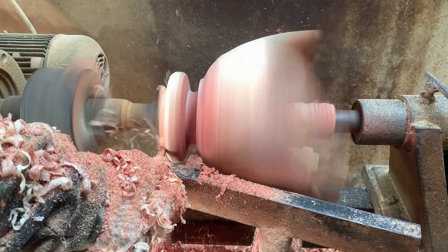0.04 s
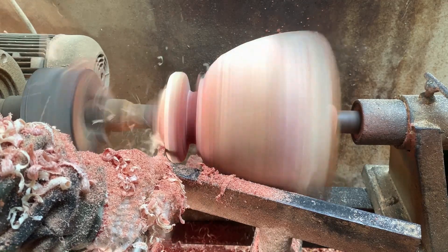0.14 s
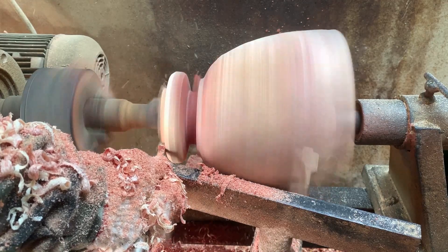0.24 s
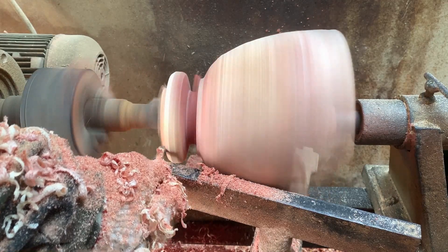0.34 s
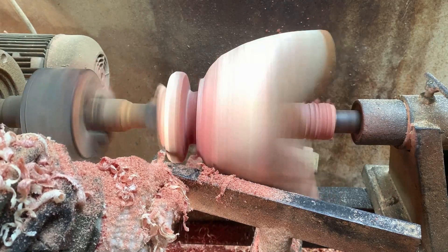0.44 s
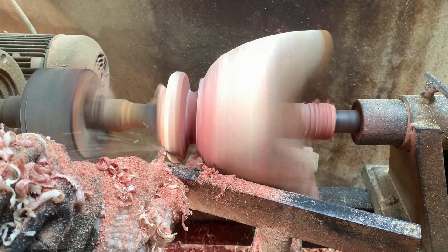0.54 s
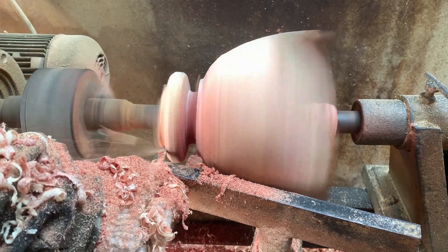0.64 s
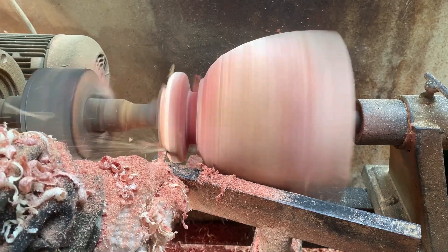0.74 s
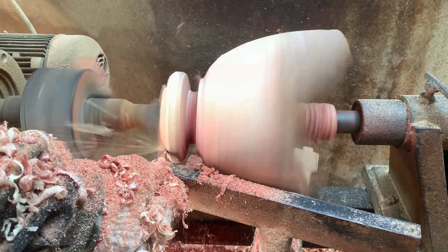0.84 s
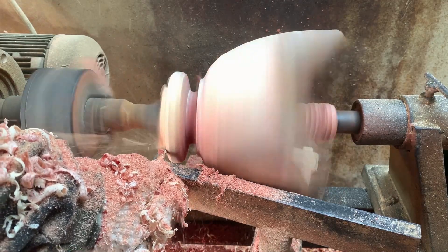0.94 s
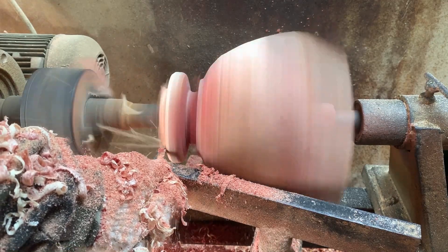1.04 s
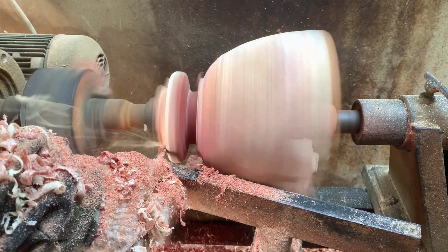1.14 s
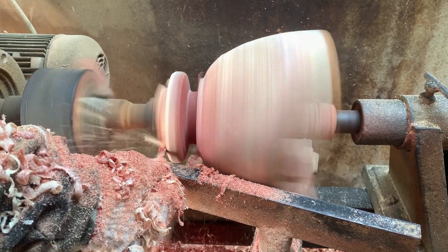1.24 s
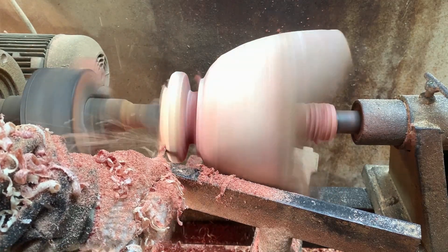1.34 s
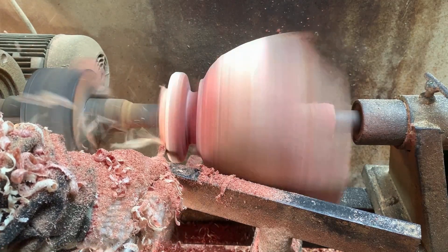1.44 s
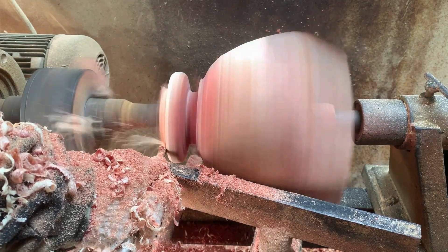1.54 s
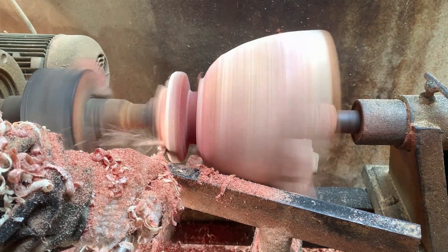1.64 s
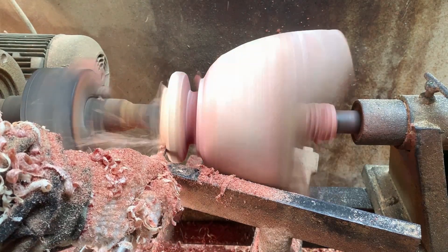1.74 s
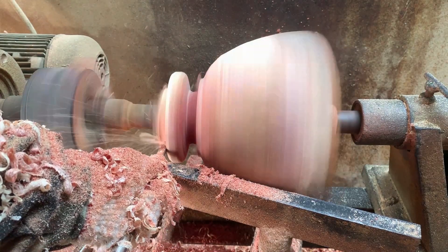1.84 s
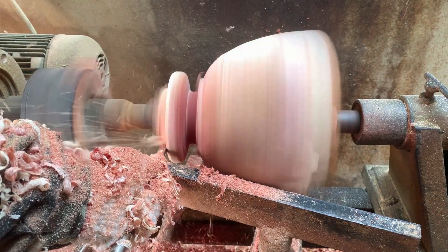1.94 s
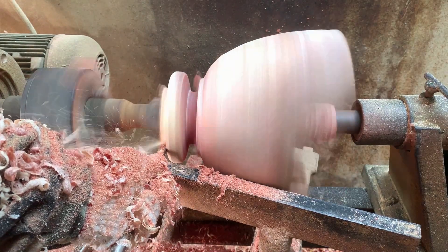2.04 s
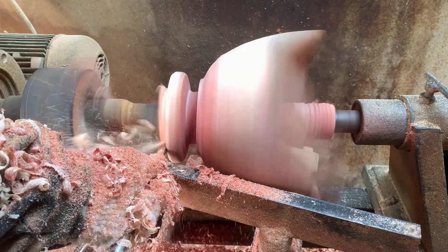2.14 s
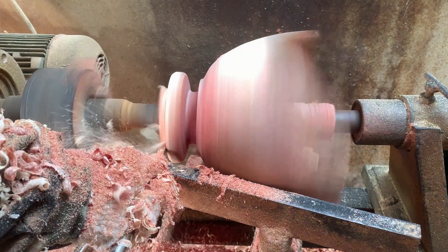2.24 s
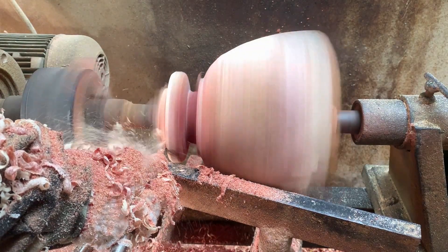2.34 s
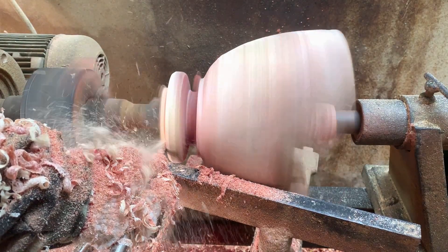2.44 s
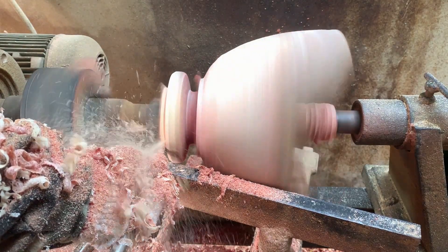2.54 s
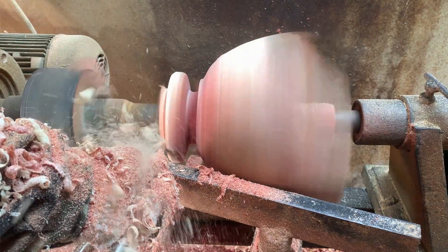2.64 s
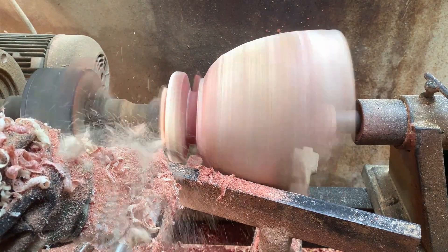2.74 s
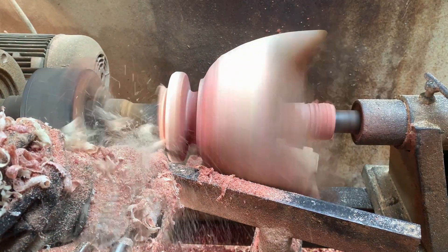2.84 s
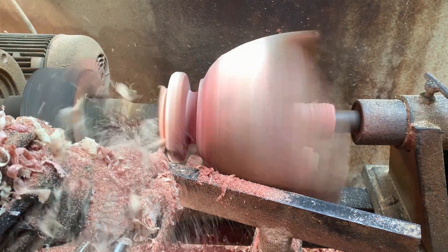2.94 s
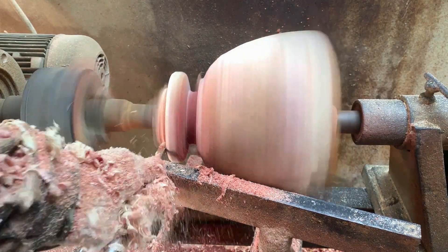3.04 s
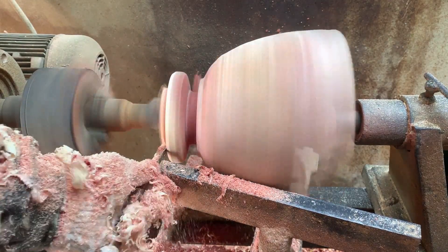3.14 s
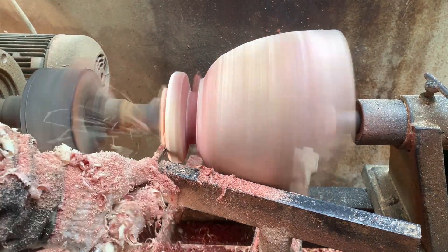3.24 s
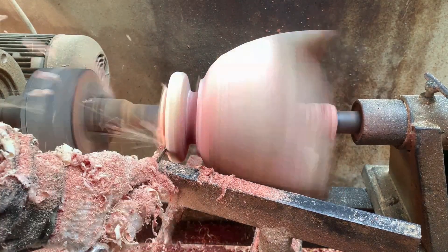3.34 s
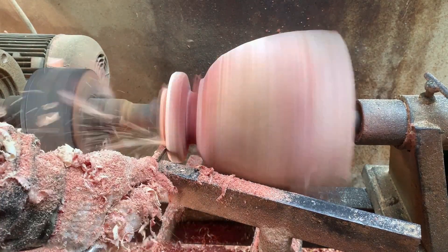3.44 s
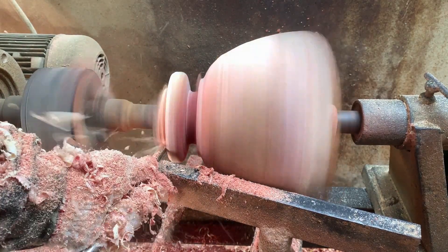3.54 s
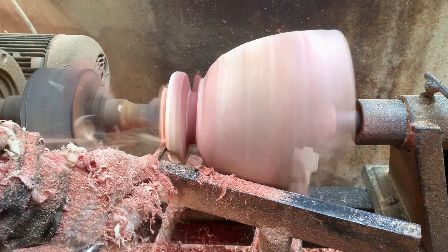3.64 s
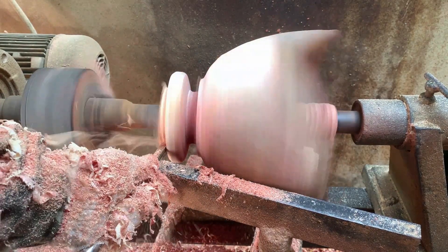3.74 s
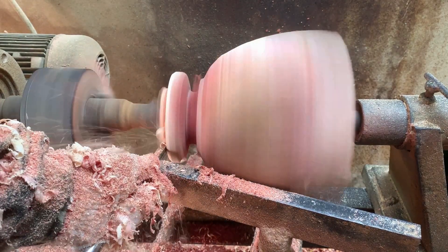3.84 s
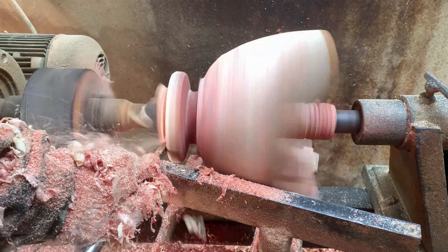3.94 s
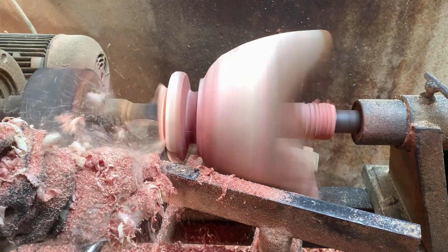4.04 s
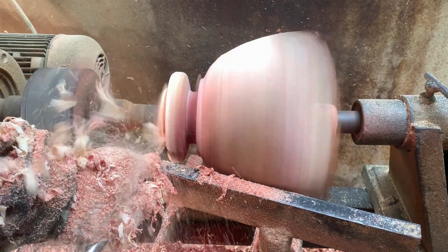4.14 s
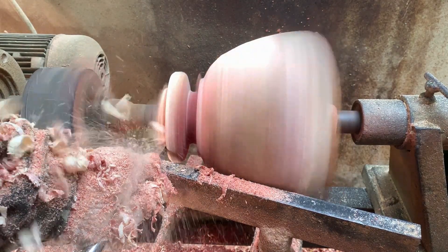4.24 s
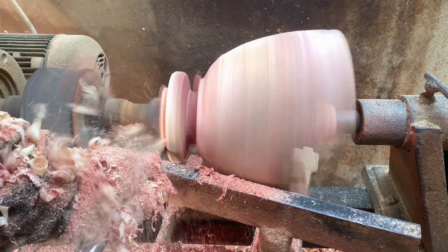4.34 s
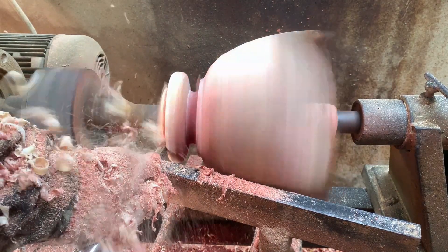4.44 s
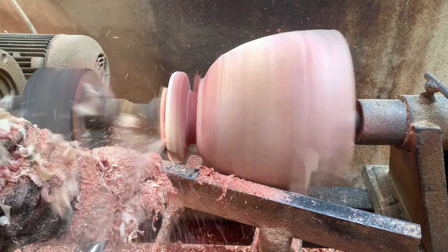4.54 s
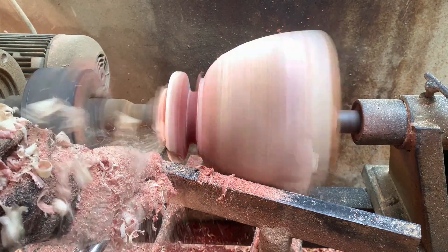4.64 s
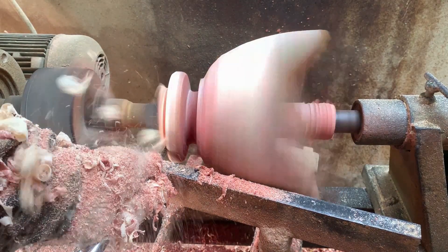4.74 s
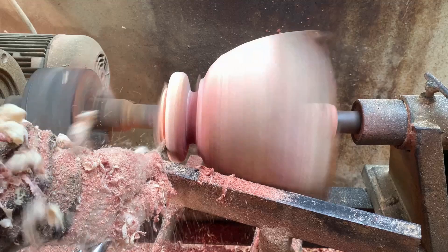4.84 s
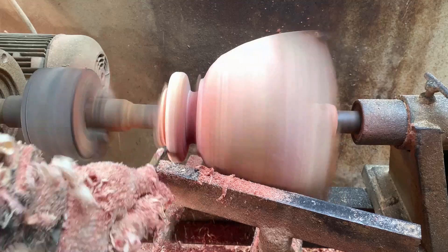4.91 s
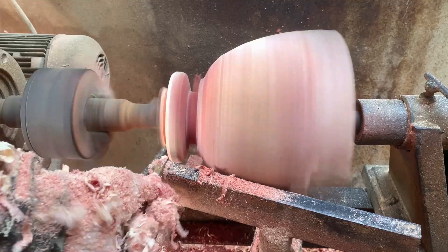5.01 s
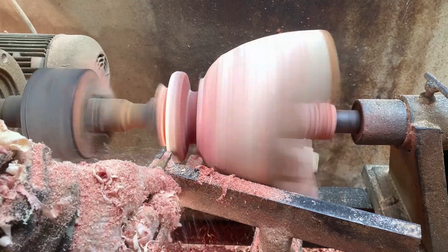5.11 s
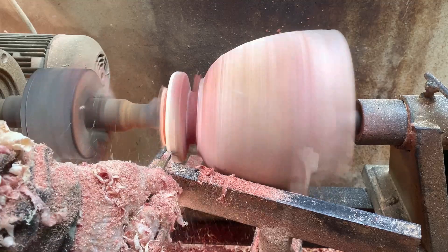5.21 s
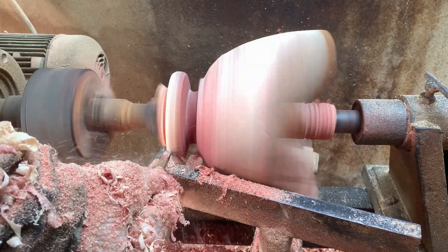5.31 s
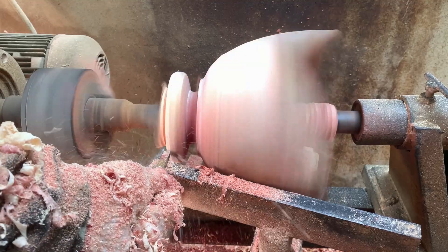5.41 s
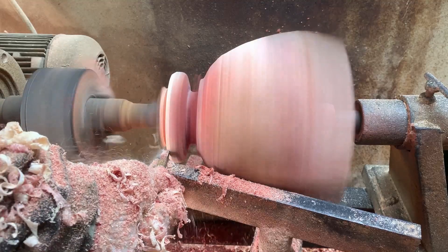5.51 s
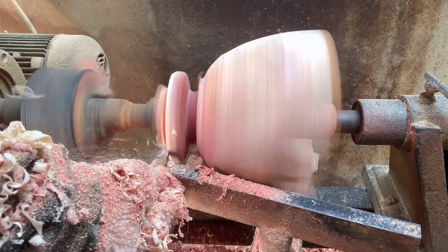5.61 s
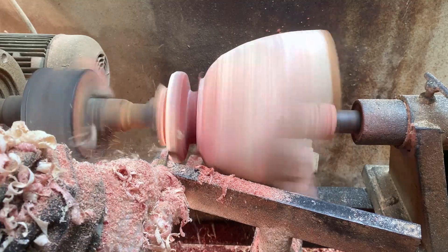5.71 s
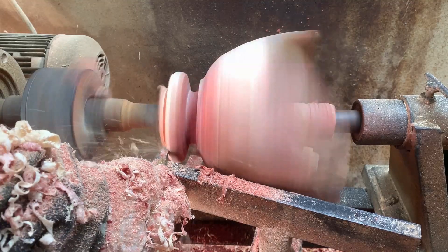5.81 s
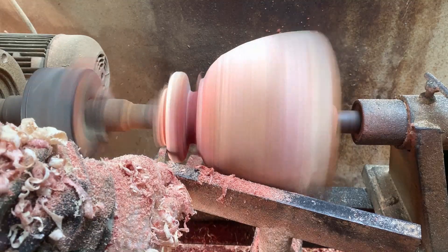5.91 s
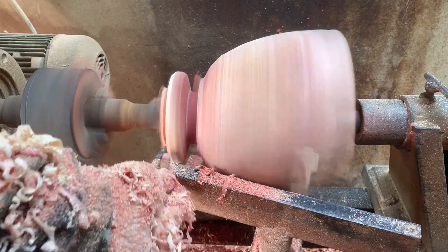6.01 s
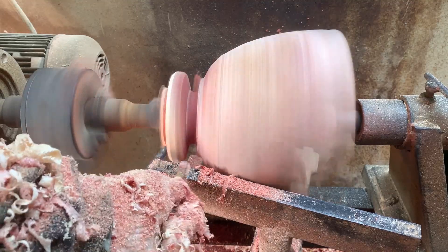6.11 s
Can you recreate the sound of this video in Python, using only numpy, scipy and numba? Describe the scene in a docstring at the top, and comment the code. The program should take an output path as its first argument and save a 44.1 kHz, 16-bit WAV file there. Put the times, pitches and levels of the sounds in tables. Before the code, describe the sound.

A lathe runs throughout, a low-level throbbing drone of motor rattle, fan noise, faint hum and very thin whine, in a close, hard-walled workshop. A rasp already under way stops at 0.25 s. Faint brushing ticks from about 0.45 s lead into a long pass: a dry hiss and tearing crackle, fluttering some 38 times a second, thickens into a hoarse squawk near 1.7 to 1.9 kHz. Small squeaks, dull thumps and sharp catches dot it; from 1.5 s the catches grow stronger, and the squawk sinks in pitch until it cuts off at 3.0 s. After a short gap, the third pass, 3.2 to 4.85 s, is equally harsh and bright, with squeaks around 3.6 s and woody bumps on the rest near 4.0 s. Motor alone briefly. A thinner, quieter, hissing scrape starts abruptly at 5.15 s, swells unevenly and lifts off at 5.9 s, leaving the drone.

```python
"""A gouge rasps and squawks in four passes on a bowl blank that a wood lathe spins at about 19 turns a second.
The edge meets end grain twice a turn: tearing fibres are dense random clicks, which also ring the steel.
The cutting force shakes the tool rest and bed, made as filtered clicks and low noise.
Under it the motor and bearings drone, as pulsing noise, a hum and a whine.
Hard workshop walls close by scatter the sound of the cut to both sides."""
import sys
import numpy as np
from scipy import signal
from scipy.fft import rfft, irfft, next_fast_len
from scipy.io import wavfile
from scipy.ndimage import uniform_filter1d
from numba import njit

SR = 44100
rng = np.random.default_rng(int(sys.argv[2]) if len(sys.argv) > 2 else 0)


def transcribe(u):
    """Save the signal u as a 16-bit wav file named by the first command-line argument.

    u: samples, shape (n,) or (channels, n), limited to [-1, 1]; the rate is SR.
    q: integer samples, one column per channel.
    """
    v = np.clip(np.atleast_2d(u).T, -1, 1)
    q = np.round(v * 32767).astype(np.int16)
    wavfile.write(sys.argv[1], SR, q)


N = 272097

# shaking of the machine by the lopsided blank: time_s, level_db
SHAKE = [(0, -46.5), (1.1, -46), (1.75, -47.5), (2.05, -47), (2.3, -48), (2.9, -49.5), (3.35, -54),
         (4.3, -51.5), (4.95, -54.5), (5.2, -53.5), (6.17, -51.5)]
STEEL_WANDER = 0.0051  # share by which the steel's pitches stray as the contact shifts


def undb(db):
    """Turn decibels into gain."""
    return 10 ** (np.asarray(db) / 20)


def curves(table):
    """Join the points of each column by straight lines in time; the first column is the time."""
    s, *columns = np.transpose(table)
    return [np.interp(np.arange(N) / SR, s, c) for c in columns]


def bins():
    """Frequencies of the spectrum lines in Hz, at least 1 so that logarithms work."""
    size = next_fast_len(N, real=True)
    return np.maximum(np.arange(size // 2 + 1) * SR / size, 1)


def shape(x, gain):
    """Filter both sides by a gain curve over frequency."""
    size = next_fast_len(N, real=True)
    return irfft(rfft(x, size) * gain, size)[:, :N]


def slope(points):
    """Gain curve through points of pitch in Hz and level in dB."""
    hz, db = np.transpose(points)
    return undb(np.interp(np.log(bins()), np.log(hz), db))


def ring(modes):
    """Gain curve of a set of resonances with steep skirts."""
    f = bins()
    power = 0
    for hz, width, db in modes:
        distance = (f * f - hz * hz) / (2 * f * width)
        power = power + (undb(db) / (1 + distance ** 2 * 2)) ** 2
    return np.sqrt(power)


def colour(x, gain):
    """Filter by a gain curve and bring to rms 1."""
    y = shape(x, gain)
    return y / y.std()


def walk(rate):
    """Slow random drift with a spread of 1, drawing a new value about rate times a second."""
    k = max(int(SR / rate), 2)
    steps = np.repeat(rng.standard_normal(N // k + 1), k)
    y = uniform_filter1d(steps, k)[:N]
    return y / y.std()


def noise():
    """Unrelated noise on the two sides."""
    return rng.standard_normal((2, N))


def fractures(rate, spread_db):
    """Dense clicks of snapping fibres, rate a second; a wider spread makes a few much larger."""
    chance = rng.random((int(rate * N / SR), 4))
    size = undb(spread_db * np.minimum(-np.log(1 - chance[:, 0]), 4))
    at = (chance[:, 1] * N).astype(int)
    # each click has the same size on both sides but an independent sign
    clicks = np.array([np.bincount(at, size * np.sign(side - .5), N) for side in chance[:, 2:].T])
    return clicks / clicks.std()


@njit
def resonate(x, hz, width):
    """Band-pass whose centre moves, built from two coupled stores of energy."""
    y, b, l = np.empty(len(x)), 0., 0.
    for i in range(len(x)):
        g, k = np.tan(np.pi * hz[i] / SR), width / hz[i]
        v = (b + g * (x[i] - l)) / (1 + g * (g + k))
        b, l, y[i] = 2 * v - b, l + 2 * g * v, k * v
    return y


def moving_ring(drive, hz, width):
    """Ring a steep resonance whose centre moves: two equal band-passes in a row, brought to rms 1."""
    y = np.array([resonate(resonate(side, hz, 2. * width), hz, 2. * width) for side in drive])
    return y / y.std()


def ease(x):
    """Smooth rise from 0 to 1."""
    x = np.clip(x, 0, 1)
    return x * x * (3 - 2 * x)


def swell(s, rise_s):
    """Envelope that starts at time s, peaks at 1 after rise_s and then dies away."""
    start, envelope = int(s * SR), np.zeros(N)
    age = np.arange(min(SR // 5, N - start)) / SR / rise_s
    envelope[start:start + len(age)] = age * np.exp(1 - age)
    return envelope


def short_tones(table, rise_s, waver):
    """A single resonance swings up and dies away, its pitch a little unsteady."""
    clock = np.cumsum(1 + waver * walk(150)) / SR
    total = 0
    for s, db, hz in table:
        tone = np.sin(2 * np.pi * (hz * clock + rng.random((2, 1)) / 2))
        total = total + undb(db) * swell(s, rise_s) * tone
    return total


def gouge():
    """Each pass eases in, changes depth steadily and lifts off; depth sets chatter pitch and layer gains."""
    # passes: start_s, end_s, attack_s, hiss_stops_sooner_s, tearing_fibres_db, edge_hiss_db, chatter_db,
    # shank_relative_to_chatter_db, tip_relative_to_hiss_db, dust_relative_to_hiss_db,
    # depth_at_start, depth_at_end (0 grazing, 1 deep)
    pass_table = [(-0.14, 0.25, 0.24, 0.008, -40.5, -40.5, -31, 1.5, -0.5, -21, 0.5, 0.56),
                  (0.445, 3, 0.3, 0.026, -37, -35.0, -26, 3.5, 0.3, -23, 0.02, 1.0),
                  (3.192, 4.855, 0.19, 0.0, -37.5, -38, -26, 3.0, 3, -24.5, 0.64, 1.04),
                  (5.148, 5.935, 0.013, 0.04, -49, -40.5, -40.5, -1, -4, -20, 0.29, 0.27)]
    # pressure of the hand on the gouge: time_s, level_db
    pressure = [(0.6, -1), (0.85, 1), (1.2, 0), (1.48, 0.4), (1.75, -1), (2.05, 1), (2.25, -2.5), (2.45, 2),
                (2.95, 0.2), (3.45, -1.4), (3.8, 1.24), (4.85, 0), (5.16, 1), (5.22, -5.5), (5.36, 1),
                (5.52, -1), (5.58, 2), (5.68, 4), (5.9, 0.5)]
    # the spinning wood just brushes the edge before it bites: start_s, level_db
    brush_table = [(0.444, -51), (0.472, -52), (0.499, -62), (0.524, -52), (0.548, -44), (0.576, -47),
                   (0.604, -39)]
    # roll of the gouge, which moves the contact along its edge: time_s, roll (about -1.5 to 1.1)
    roll = [(0, -1.1), (0.3, -0.57), (0.55, -0.49), (0.8, -0.28), (1.5, 0.07), (3.0, 1.12), (3.25, -1.51),
            (3.9, -1.06), (4.85, 0.19), (5.15, -0.71), (5.52, -0.67), (5.58, 0.22), (5.9, -0.53)]
    # how far out of round the wood is under the edge: time_s, runout (0 true, about 1 lopsided)
    runout = [(0.0, 0.3), (0.85, 0.34), (1.05, 1.03), (1.6, 0.68), (2.1, 0.47), (2.6, 0.2), (3.1, 0.21),
              (3.35, 0.8), (3.85, 1.1), (4.05, 0.34), (6.17, 0.22)]
    release_db_per_s, ring_on_db_per_s = 291, 217  # the rasp dies as the gouge lifts off, chatter more slowly
    bite_depth = 0.41  # below this depth the edge rubs more than it cuts
    rub_chatter_db, rub_tear_db, rub_hiss_db = -20, -2.5, 6.5  # rubbing: less chatter and tearing, more hiss
    buried_depth, buried_db = 0.63, -31  # past this depth the wood damps the tip, by this much per unit of depth
    buried_smoothing = 1.33  # a buried edge cuts more evenly: share of twice-a-turn swing lost per unit of depth
    bed_db, bed_build_s = 3, 0.42  # bed vibration relative to tearing, and the time it takes to build
    shank_depth_db, dust_depth_db = -16.5, 17  # by depth 1 the shank rings less and more dust flies
    # the shank breaks into ringing abruptly at this depth
    shank_on_depth, shank_on_range, shank_idle_db = 0.224, 0.02, -4
    grazing_hz, depth_sag_hz = 1911, 267.4  # chatter pitch at depth 0, and its fall by depth 1

    t, rows = np.arange(N) / SR, np.array(pass_table)
    current = np.maximum(np.searchsorted(rows[:, 0], t, side="right") - 1, 0)
    (start, end, attack, sooner, tear_db, hiss_db, chatter_db, shank_db, tip_db, dust_db,
     first_depth, last_depth) = rows[current].T
    age = t - start
    lifted = np.maximum(t - end, 0)
    edge_lifted = np.maximum(t - end + sooner, 0)
    push = ease(age / attack) * undb(curves(pressure)[0])
    depth = first_depth + (last_depth - first_depth) * np.minimum(age / (end - start), 1)
    rub = np.maximum(1 - depth / bite_depth, 0)
    buried = np.maximum(depth - buried_depth, 0)
    brush = sum(undb(db) * swell(s, rise_s=0.0036) for s, db in brush_table)
    shank_idle = 1 - ease((depth - shank_on_depth) / shank_on_range)
    return dict(tear=push * undb(tear_db + rub_tear_db * rub - release_db_per_s * lifted),
                hiss=brush + push * undb(hiss_db + rub_hiss_db * rub - release_db_per_s * edge_lifted),
                chatter=push * undb(chatter_db + rub_chatter_db * rub - ring_on_db_per_s * lifted),
                bed=push * ease(age / bed_build_s) * undb(tear_db + bed_db - ring_on_db_per_s * lifted),
                shank=undb(shank_db + shank_depth_db * depth + shank_idle_db * shank_idle),
                dust=undb(dust_db + dust_depth_db * depth),
                tip=undb(tip_db + buried_db * buried),
                swing=1 - buried_smoothing * buried,
                hz=grazing_hz - depth_sag_hz * depth,
                depth=depth, roll=curves(roll)[0], runout=curves(runout)[0])


def bite(turn, grain_db, grain_at, knock_db, knock_at, uneven_db, gap_db):
    """Cutting force: end grain twice a turn with a slack gap between, one knock a turn; no turn is alike."""
    grain = np.cos(4 * np.pi * (turn - grain_at))
    slack = ((1 - grain) / 2) ** 4
    high_side = np.cos(np.pi * (turn - knock_at)) ** 10
    force = undb(grain_db * grain - gap_db * slack + knock_db * high_side + uneven_db * walk(130))
    return force / np.sqrt(np.mean(force ** 2))


def rasp(turn, tool, crack):
    """Fibres tear in bursts; the same rhythm of force rings the steel, throws fine dust and snaps chips."""
    # spectrum of tearing fibres: pitch_hz, level_db
    tear_spectrum = [(300, -11.5), (550, 5), (780, 1), (980, 0.5), (1120, 1.5), (1400, 4.5), (2150, -0.5),
                     (2700, -2), (2900, 2.5), (3700, 0.5), (4900, -6), (5600, -5.5), (9000, -15),
                     (15000, -50)]
    # spectrum of the edge's hiss: pitch_hz, level_db
    hiss_spectrum = [(1500, -13.5), (3000, -11.5), (5100, -2), (5500, -5.5), (6600, -4), (7600, -4),
                     (7930, -6), (8150, 1), (9100, -10), (10100, -35), (10900, -21), (13000, -16),
                     (14200, -20), (15200, -43)]
    # spectrum of fine dust: pitch_hz, level_db
    dust_spectrum = [(8000, -8.5), (10500, 4.5), (12000, 4.5), (13700, -7), (14500, -16), (15600, -21)]
    force = bite(turn, grain_db=1.76 * tool["swing"], grain_at=0.38, knock_db=3.4 * tool["runout"],
                 knock_at=0.85, uneven_db=1.74, gap_db=4.4 * tool["swing"])
    tear = colour(fractures(rate=9000, spread_db=2.5), slope(tear_spectrum)) * undb(1.6 * walk(110))
    hiss = colour(fractures(rate=12000, spread_db=4.5), slope(hiss_spectrum)) * undb(-6.0 + 2.5 * walk(110))
    dust = colour(fractures(rate=3400, spread_db=0.0), slope(dust_spectrum)) * tool["dust"]
    edge = (hiss + steel(tool) + tip(tool) + dust) * tool["hiss"] * undb(3.0)
    # tearing follows the force only weakly, and cracks add to it
    tear_gain = force ** 0.35 * tool["tear"] * undb(7.0) + crack * undb(-6.5)
    return force * edge + tear * tear_gain + force * chips(tool)


def steel(tool):
    """Snapping fibres ring the steel, whose pitches wander and glide as the contact shifts."""
    # ringing of the steel: pitch_hz, width_hz, level_db, change_with_roll_db, change_with_depth_db,
    # glide_with_depth_hz
    steel_modes = [(2907, 220, -9, 0, -5.5, -30), (5970, 370, -7, -4.5, -2.5, 140),
                   (7320, 490, -5.5, 2.5, -1.5, 0), (8380, 760, -12, 1.5, 2.5, -200),
                   (9810, 520, -9.5, 5, 0.5, -260), (13830, 450, -22, 4.5, 1, -150)]
    total = 0
    for hz, width, db, roll_db, depth_db, glide_hz in steel_modes:
        pitch_hz = (hz + glide_hz * tool["depth"]) * (1 + STEEL_WANDER * walk(14))
        mode = moving_ring(fractures(rate=6000, spread_db=2.5), pitch_hz, width)
        level_db = db + roll_db * tool["roll"] + depth_db * tool["depth"] + 1.68 * walk(60)
        total = total + mode * undb(level_db)
    return total


def tip(tool):
    """The tip of the gouge rings as fibres snap, lower in a deep cut and damped when buried."""
    top_hz, sag_hz = 4370, 130  # ring at depth 0, and its fall by depth 1
    hz = (top_hz - sag_hz * tool["depth"]) * (1 + STEEL_WANDER * walk(14))
    tone = moving_ring(fractures(rate=5400, spread_db=3.5), hz, 227)
    return tone * tool["tip"] * undb(-3.0 + 1.96 * walk(60))


def chips(tool):
    """Coarse chips snap off among the fibres, clicks ringing at a quickly changing random pitch."""
    middle_hz, scatter, level_db = 3600, 0.22, -5  # level relative to the gouge's tearing gain
    hz = np.clip(middle_hz * np.exp(scatter * walk(70)), 2000, 7000)
    return moving_ring(fractures(rate=700, spread_db=2.5), hz, 340) * tool["tear"] * undb(level_db)


def chatter(turn, tool, surge):
    """The gouge bounces in a rough squawk that flares at each knock and sinks as the cut deepens."""
    # close bending modes of the chattering gouge: multiple_of_chatter_pitch, width_hz, level_db
    chatter_modes = [(0.93, 100, -9), (1.0, 95, -0.65), (1.075, 110, -11.5)]
    # resonances of the gouge's shank: pitch_hz, width_hz, level_db
    shank_modes = [(2120, 200, -13.5), (2254, 62, -3), (2427, 87, 0.5), (2547, 69, -8.5)]
    waver = 0.022  # share by which the chatter pitch strays
    hz = tool["hz"] * (1 + waver * walk(55))
    force = bite(turn, grain_db=0.6, grain_at=0.16, knock_db=5.0 * tool["runout"], knock_at=0.825,
                 uneven_db=0.5, gap_db=0.0)
    squawk = 0
    for multiple, width, db in chatter_modes:
        mode = moving_ring(fractures(rate=5000, spread_db=0.5), hz * multiple, width)
        squawk = squawk + mode * undb(db)
    shank = colour(fractures(rate=3000, spread_db=1.5), ring(shank_modes))
    # a catch plucks the tool, which swings at its own pitch
    pluck = np.sin(2 * np.pi * (np.cumsum(hz) / SR + rng.random((2, 1))))
    bouncing = force * tool["chatter"] * undb(2.0) * (squawk + shank * tool["shank"])
    return bouncing + pluck * surge * undb(-1.5)


def catches(rise_s, build_s):
    """Where a chip tears out, the chatter builds and subsides evenly while the crack starts sharply."""
    # the edge catches and tears out a chip: start_s, level_db, crack_relative_db
    catch_table = [(0.606, -27, -4), (0.702, -29, -5), (0.731, -28, -3), (0.992, -21, -9), (1.052, -27, -3),
                   (1.212, -18, -6), (1.3668, -18, -11), (1.474, -17, 0), (1.525, -23, -7),
                   (1.578, -15, -4), (1.628, -13, -21), (1.679, -11, -11), (1.7184, -13, -13),
                   (1.738, -14, -21), (1.945, -25, -14), (2.006, -13, -7), (2.41, -26, -3),
                   (2.49, -19, -19.5), (2.507, -13, -17), (2.5424, -13, -32), (2.7362, -12, -15),
                   (2.753, -13.5, -20.5), (2.803, -14, -18.5), (2.9048, -13.5, -23.5), (2.9587, -9.5, -9),
                   (2.987, -16.5, -6.5), (3.0116, -15.5, -4), (3.025, -15, -25), (3.3457, -10.5, -13),
                   (3.4996, -13.5, -8), (3.552, -12, -9), (3.6093, -26, -8), (3.719, -18, -19),
                   (3.769, -16, -6), (3.852, -18, -6), (3.878, -21, -4), (3.959, -13, -16),
                   (3.973, -19, -18), (4.2454, -14, -22), (4.2961, -12, -16), (4.668, -12, -16)]
    t, surge, crack = np.arange(N) / SR, 0, 0
    for s, db, crack_db in catch_table:
        surge = surge + undb(db) * ease(1 - np.abs(t - s - rise_s) / build_s)
        crack = crack + undb(db + crack_db) * swell(s, rise_s)
    return surge, crack


def squeaks():
    """The bevel rubs and squeaks briefly, each time as one short unsteady tone."""
    # squeaks of the bevel: start_s, level_db, pitch_hz
    squeak_table = [(1.049, -18.5, 2280), (1.102, -19, 2297), (1.155, -23, 2510), (1.209, -23, 2510),
                    (1.475, -20, 2440), (3.56, -20, 2330), (3.612, -23, 2290), (3.668, -20, 2248),
                    (3.775, -24, 2364)]
    return short_tones(squeak_table, rise_s=0.006, waver=0.01786)


def bumps():
    """The iron bed is knocked and answers with a short unsteady tone."""
    # knocks on the bed: start_s, level_db, pitch_hz
    bump_table = [(4.005, -24.5, 446), (4.057, -23.5, 451), (4.11, -30, 455)]
    return short_tones(bump_table, rise_s=0.0053, waver=0.025)


def thumps(rise_s, width_hz):
    """Soft low knocks: resonant noise that swells and dies within a few hundredths of a second."""
    # dull low thumps while the shavings fly: start_s, level_db, pitch_hz
    thump_table = [(0.716, -37, 165.7), (0.742, -36, 110), (0.775, -41, 189), (0.905, -38, 135),
                   (0.945, -39, 160), (1.052, -38, 160), (1.205, -41, 170), (1.375, -42, 100),
                   (1.982, -42, 90), (2.008, -42, 180), (2.04, -39, 170)]
    _, hz = curves(thump_table)
    envelope = sum(undb(db) * swell(s, rise_s) for s, db, _ in thump_table)
    return moving_ring(noise(), hz, width_hz) * envelope


def bed(turn, tool):
    """Cutting force and lopsided blank shake the iron bed and the tool rest, whose pitch wavers."""
    # resonances of the bed: pitch_hz, width_hz, level_db
    bed_modes = [(185, 76, -19), (455.5, 54, -2), (525, 100, -13), (619, 67, 1), (960, 115, -10.5)]
    # spectrum of the low rumble: pitch_hz, level_db
    rumble_spectrum = [(20, -2), (50, -10), (90, 10.5), (140, 2.5), (200, 3), (290, -1), (400, -9),
                       (700, -36)]
    rest_hz, rest_waver, rest_db = 621.5, 0.024, -4  # ring of the tool rest
    bed_shake_db = 6  # bed vibration relative to the shaking of the machine
    shake = undb(curves(SHAKE)[0])
    force = bite(turn, grain_db=1.0, grain_at=0.17, knock_db=1.5, knock_at=0.31, uneven_db=2.0, gap_db=0.0)
    rest = moving_ring(fractures(rate=800, spread_db=1.5), rest_hz * (1 + rest_waver * walk(12)), 38.5)
    iron = colour(fractures(rate=800, spread_db=2.5), ring(bed_modes))
    body = iron * undb(-1.5) + rest * undb(rest_db)
    rumble = colour(noise(), slope(rumble_spectrum))
    return force * (body * np.hypot(tool["bed"], shake * undb(bed_shake_db)) + rumble * shake)


def sliding_dips(x):
    """Two narrow dips move together through the treble and give the scrape its hollow colour."""
    # the lower dip slides as the gouge travels: time_s, pitch_hz, depth_db
    dip_table = [(0.25, 5000, -6), (0.5, 5500, -13), (1.3, 5430, -10), (2.0, 5580, -7), (2.6, 5840, -12),
                 (3.1, 5650, -5), (3.2, 5351, -7), (3.55, 5300, -9), (4.0, 4950, 0), (4.9, 4986, -1),
                 (5.2, 5080, 0), (5.9, 5080, -2)]
    width_hz, upper_ratio, upper_width_hz = 610, 2.13, 860  # its twin is a little over an octave up
    hz, db = curves(dip_table)
    for centre, width in ((hz, width_hz), (hz * upper_ratio, upper_width_hz)):
        band = np.array([resonate(side, centre, 1. * width) for side in x])
        x = x - (1 - undb(db)) * band
    return x


def hollows():
    """Gain curve of the fixed narrow dips in the sound of the cut."""
    # narrow dips: pitch_hz, width_hz, depth_db
    hollow_table = [(2730, 160, -1.5), (7810, 210, -7), (9250, 290, -0.5)]
    return undb(sum(db * np.exp(-(2 * (bins() - hz) / width) ** 2) for hz, width, db in hollow_table))


def left_right():
    """Gain curves that lean the cut to the right by pitch, with the two sides' mean power kept."""
    # leaning of the cut to the right, strongest near 8 to 9 kHz: pitch_hz, left_minus_right_db
    lean_table = [(60, -3.5), (200, -2.5), (600, -1), (1300, 0), (4400, -.5), (6000, -1), (7300, -4),
                  (7900, -5), (8100, -13), (8700, -11), (9700, -6), (10500, -1), (11500, 0)]
    lean = np.sqrt(slope(lean_table))
    sides = np.array([lean, 1 / lean])
    return sides / np.sqrt(np.mean(sides ** 2, axis=0))


def workshop(x, t60_s, wet_db, near_s, near_db):
    """A quick scatter off the machine and the wall behind it, and a short room tail, as fading noise."""
    t = np.arange(SR // 2) / SR
    out = x
    for decay_s, db in ((near_s, near_db), (t60_s, wet_db)):
        echo = rng.standard_normal((2, len(t))) * np.exp(-np.log(1000) * t / decay_s)
        echo = echo / np.sqrt(np.sum(echo ** 2, axis=1, keepdims=True))
        out = out + undb(db) * signal.fftconvolve(x, echo, axes=1)[:, :N]
    return out


def drive_train(turn):
    """The housing rattles once each motor turn, harder when shaken, over fan noise, a low hum and a thin whine."""
    # resonances of the motor housing: pitch_hz, width_hz, level_db
    housing_modes = [(439, 41, -13), (638.4, 44, -1.5), (750, 82, -6.5), (1290, 104, -4.5),
                     (2050, 200, -26), (2170, 370, -25.5), (5350, 270, -30), (6200, 130, -32),
                     (6860, 210, -44), (8200, 260, -36)]
    # spectrum of the fan noise: pitch_hz, level_db
    fan_spectrum = [(25, -10), (60, -23), (100, -7), (240, -6.5), (320, -9), (560, 0.5), (1000, -13.5),
                    (1600, -6.5), (2800, -16.5), (4500, -25), (7500, -28), (9500, -36), (11000, -68),
                    (15000, -71)]
    spindle_to_motor = 1.605  # belt ratio: motor turns per spindle turn
    rattle_per_shake = 0.52  # dB that rattle and fan noise gain per dB of shaking
    motor_turn = spindle_to_motor * turn
    shake_db, = curves(SHAKE)
    shaken = undb(rattle_per_shake * (shake_db - shake_db.mean()))
    throb = undb(3.4 * np.cos(2 * np.pi * (motor_turn + .15)) + .6 * walk(60))
    housing = colour(noise(), ring(housing_modes)) * throb * undb(-38.5)
    fan = colour(noise(), slope(fan_spectrum)) * undb(-44.0)
    # the hum swings three times a motor turn and is louder on the right
    hum = np.sin(2 * np.pi * 3 * motor_turn + .9 * walk(9)) * undb(3 * walk(14))
    whine = colour(noise(), ring([(12020, 45, 0)])) * undb(-70)
    return (housing + fan) * shaken + whine + hum * undb([[-65], [-61]])


def scene():
    """The gouge on the turning blank, over the running machine."""
    # spindle speed, sagging under load: time_s, turns_per_second
    spindle = [(0.0, 18.27), (0.5, 19.22), (1.0, 18.83), (1.5, 18.75), (2.2, 18.66), (2.85, 18.52),
               (3.2, 19.3), (3.6, 18.64), (4.1, 18.44), (4.7, 18.78), (5.15, 18.98), (5.6, 19.08),
               (5.85, 18.85), (6.17, 18.1)]
    turn = np.cumsum(curves(spindle)[0]) / SR
    tool = gouge()
    surge, crack = catches(rise_s=.0038, build_s=.0095)
    cut = rasp(turn, tool, crack) + chatter(turn, tool, surge) + bed(turn, tool)
    cut = cut + thumps(rise_s=0.013, width_hz=69) * undb(-2.5) + squeaks() + bumps()
    cut = shape(sliding_dips(cut), hollows() * left_right())
    return workshop(cut, t60_s=0.26, wet_db=-12.5, near_s=0.055, near_db=-14.0) + drive_train(turn)


def record(dry):
    """Low-pass: nothing is kept above about 15600 Hz."""
    return signal.sosfilt(signal.ellip(10, .2, 80, 15600, fs=SR, output="sos"), dry)


dry = scene()
out = record(dry)
transcribe(out)
```